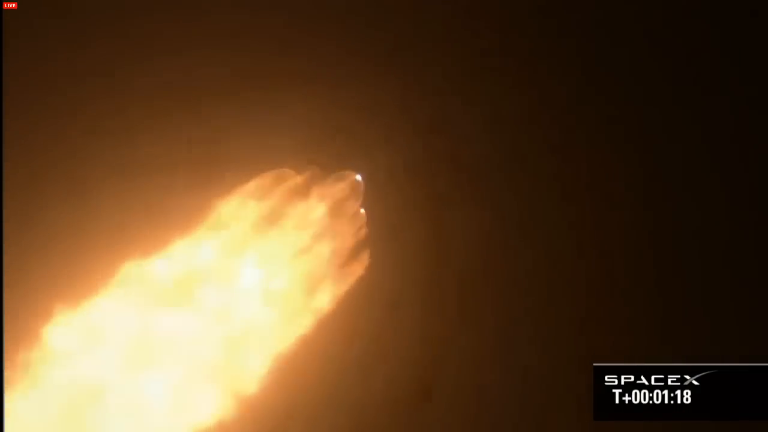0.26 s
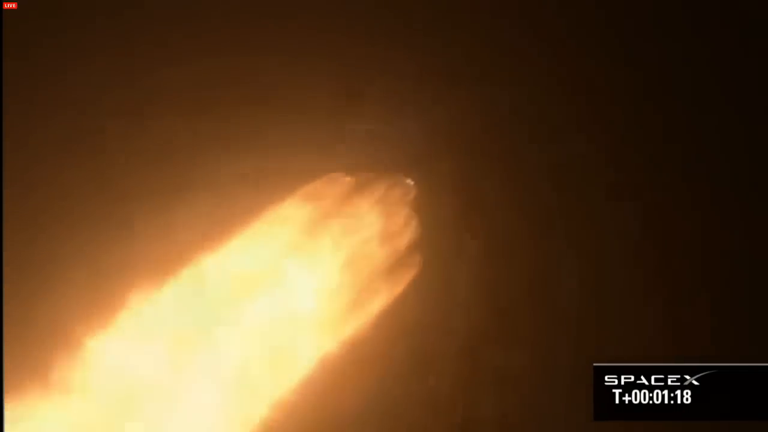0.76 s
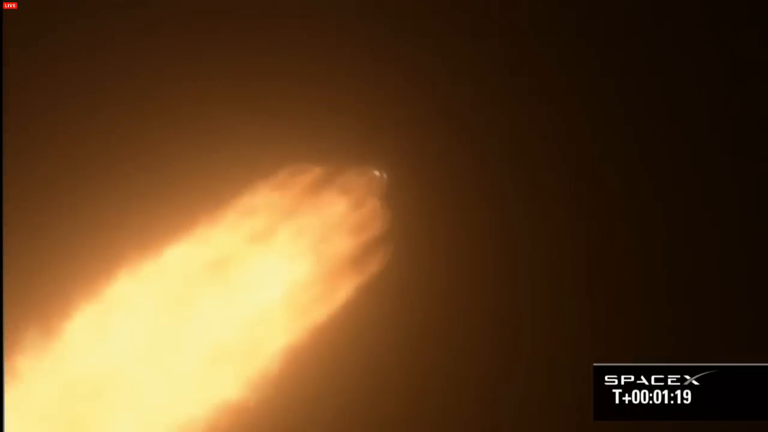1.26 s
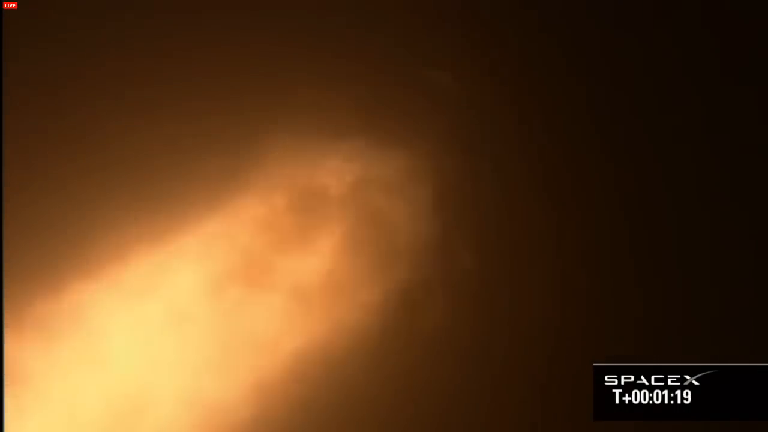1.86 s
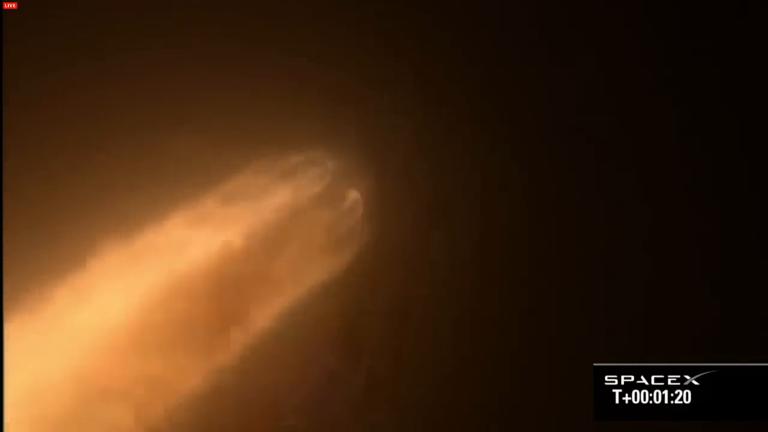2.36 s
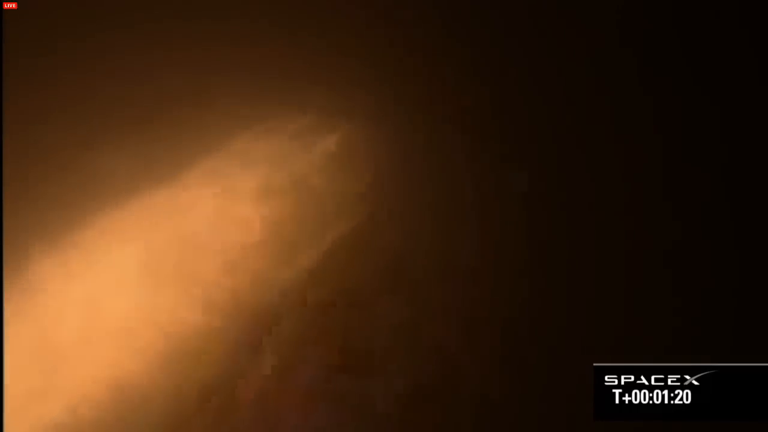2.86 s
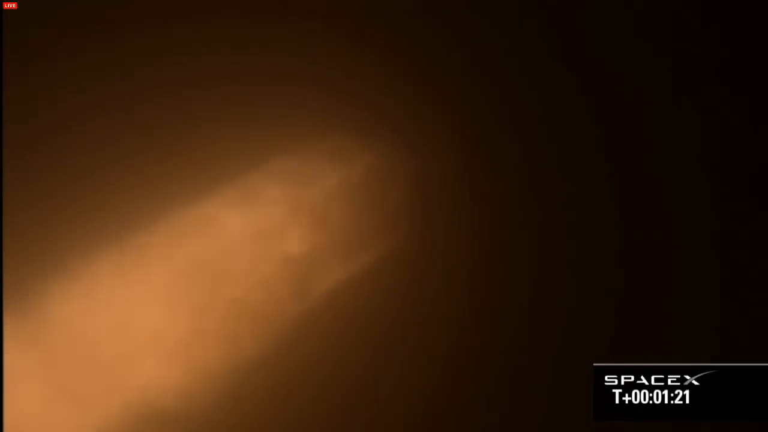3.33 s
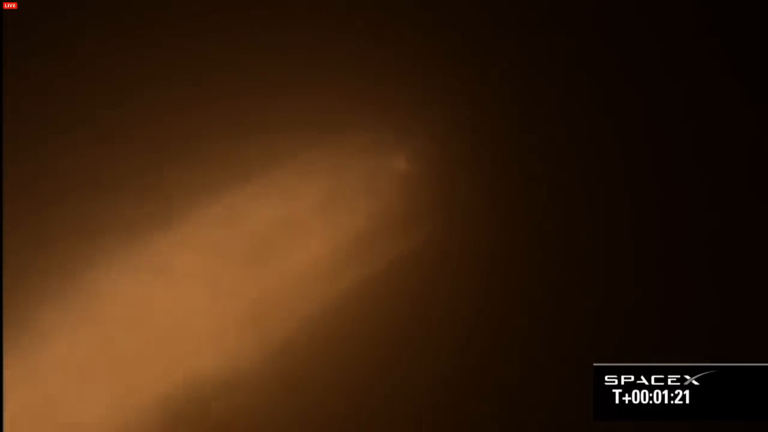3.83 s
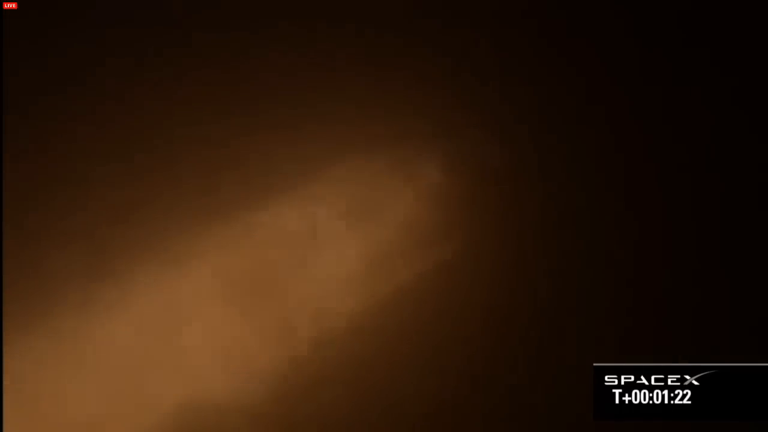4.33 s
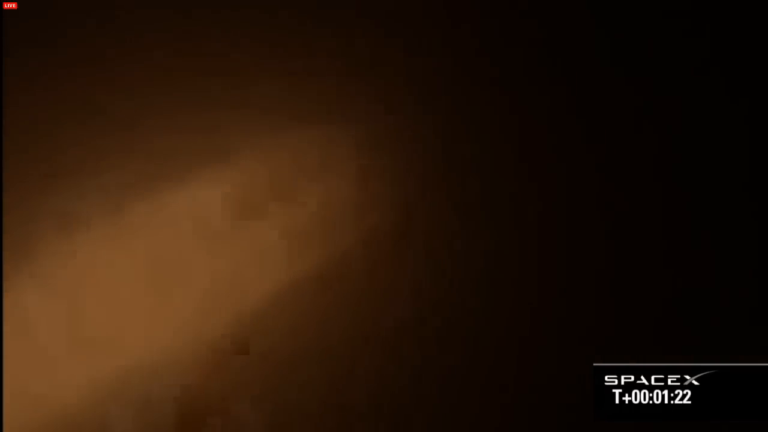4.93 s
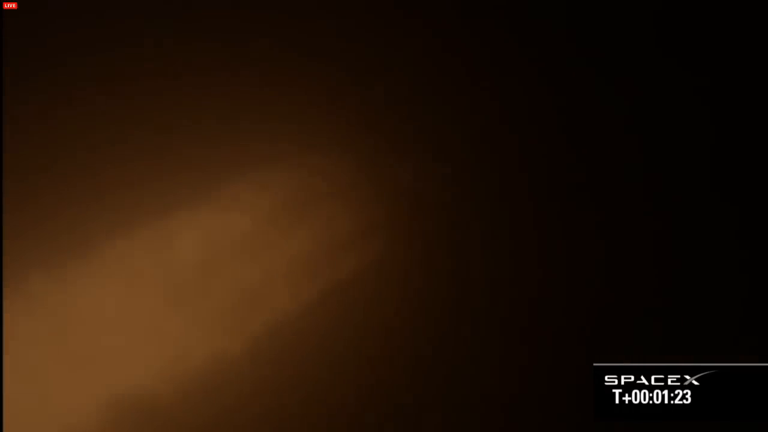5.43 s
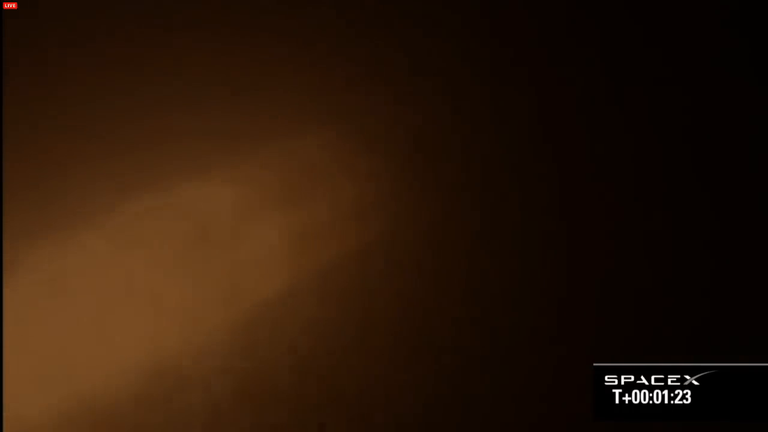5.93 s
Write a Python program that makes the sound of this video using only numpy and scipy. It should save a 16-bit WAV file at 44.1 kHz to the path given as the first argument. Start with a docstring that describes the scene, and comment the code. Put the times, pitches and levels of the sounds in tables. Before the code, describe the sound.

Low throbbing engine thunder from far overhead grows louder, crackling softly, beneath shrill cricket chirps, then distorts through a strained broadcast link.

```python
"""A rocket climbing far off at night, heard from the ground: a deep, lumpy rumble that swells, with soft crackle.
The rumble is shaped noise in several bands, dulled by the distance; the crackle is a dense train of tiny clicks.
Close to the microphone, crickets made of short gliding tones sing over soft air, a distant chorus and two ticks.
A faint rush of noise slides upward. A broadcast link breaks up roughly at the loudest rumble, rides the gain and
limits the treble, and its slipping sample clock lends the rumble a thin, high buzz."""
import sys
import numpy as np
from scipy import signal
from scipy.fft import rfft, irfft
from scipy.io import wavfile
from scipy.ndimage import uniform_filter1d

SR = 44100
rng = np.random.default_rng(int(sys.argv[2]) if len(sys.argv) > 2 else 0)


def generate_wav(signal):
    """Clip the signal to [-1, 1] and save it as 16-bit WAV at the path in sys.argv[1]."""
    frames = np.transpose(np.atleast_2d(signal))
    scaled = np.clip(frames, -1, 1) * 32767
    pcm = np.round(scaled).astype(np.int16)
    wavfile.write(sys.argv[1], SR, pcm)


N = 272888
TIME = np.arange(N) / SR  # seconds

# All source levels are those before the link's gain control.


def gain_of(db):
    """Decibels to amplitude."""
    return 10 ** (np.asarray(db) / 20)


def evened(x):
    """Scales to rms 1."""
    return x / np.sqrt(np.mean(x ** 2) + 1e-20)


def level(curve):
    """A table of (time_s, level_db) as a gain for every sample."""
    return gain_of(np.interp(TIME, *np.transpose(curve)))


def coloured(x, shape):
    """Gives x a spectrum of (freq_hz, level_db) points, silent outside them, at rms 1."""
    hz, db = np.transpose(shape)
    bins = np.fft.rfftfreq(N, 1 / SR)
    shape_db = np.interp(np.log(bins + 1), np.log(hz), db, left=-np.inf, right=-np.inf)
    return evened(irfft(rfft(x) * gain_of(shape_db), N))


def noise(shape):
    """Noise with a spectrum of (freq_hz, level_db) points, at rms 1."""
    return coloured(rng.standard_normal(N), shape)


def swells(events, half_s):
    """A gain that rises or dips in one smooth arch at each (centre_s, peak_db) event and is 1 between them."""
    db = np.zeros(N)
    for centre, peak_db in events:
        near = abs(TIME - centre) < half_s
        arch = np.cos(np.pi / 2 * (TIME[near] - centre) / half_s) ** 2
        db[near] += peak_db * arch
    return gain_of(db)


def steadied(x, span_s):
    """Lets x throb quickly but holds its power near 1 over longer spans."""
    span = int(span_s * SR)
    power = uniform_filter1d(uniform_filter1d(x ** 2, span), span)
    return evened(x / np.sqrt(power + 1e-6))


# spectrum of the soft outdoor wash: freq_hz, level_db
AIR_SPECTRUM = [(100, 15), (500, -1.5), (1100, 1.5), (1600, -3), (2300, -6.5), (3200, -12), (4300, -16),
                (5000, -16.5), (5800, -29), (9000, -25), (16000, -36)]
# spectrum of the wide hiss: freq_hz, level_db
HISS_SPECTRUM = [(100, 0), (2200, -6), (3500, 0), (6500, 2), (9500, -2), (12000, -2), (16000, -5)]


def night_air(air_db=-57.2, hiss_db=-70):
    """A soft outdoor wash in the middle and a fainter hiss, independent in each channel."""
    hiss = gain_of(hiss_db) * coloured(rng.standard_normal((2, N)), HISS_SPECTRUM)
    air = gain_of(air_db) * noise(AIR_SPECTRUM)
    return air + hiss


# spectrum of the distant crickets: freq_hz, level_db
CHORUS_SPECTRUM = [(5800, -52.5), (6450, -20.5), (6720, -5.5), (6920, 3), (7100, -1), (7300, -9),
                   (7500, -18.5), (8600, -21.5), (10000, -39)]
# moments when many distant crickets chirp together: centre_s, rise_db (above the steady chorus)
CHORUS_UNISONS = [(.22, 3), (.47, 3.5), (.876, 3.5), (1.29, 4), (1.51, 3), (1.826, 3), (2.222, 3.5),
                  (2.722, 3.5), (2.99, 2.5), (3.256, 1), (3.472, 1.5), (3.714, 1), (4.05, 3.5),
                  (4.293, 1.5), (4.6, 2), (4.913, 1.5), (5.187, 2.5), (5.409, 4.5)]


def chorus(steady_db=-67):
    """Many distant crickets merge into one shrill band that pulses when their chirps coincide."""
    pulses = swells(CHORUS_UNISONS, half_s=.1)
    return gain_of(steady_db) * pulses * noise(CHORUS_SPECTRUM)


def cricket(chirps, pitch_hz, fall_hz, gap_s, half_stroke_s):
    """Each wing stroke rings the wing near one pitch, which sags as the stroke slows."""
    out = np.zeros(N)
    for start, strokes, db in chirps:
        for k in range(round(strokes)):
            centre = start + k * gap_s
            near = abs(TIME - centre) < half_stroke_s
            u = (TIME[near] - centre) / half_stroke_s  # -1 to 1 through the stroke
            hz = pitch_hz + rng.normal(0, 26) - fall_hz * u
            tone = np.sin(2 * np.pi * np.cumsum(hz) / SR)
            envelope = np.cos(np.pi * u / 2) ** 2
            out[near] += gain_of(db + rng.normal(0, 1)) * envelope * tone
    return out


# Cricket songs: start_s (centre of the first wing stroke), strokes (count), level_db (varied a little per stroke)
# the nearest cricket
NEAR_CHIRPS = [(.16, 3, -60), (.41, 2, -64), (.60, 2, -61), (.87, 3, -62), (1.205, 3, -68), (1.53, 3, -63),
               (1.82, 3, -61), (2.233, 2, -60.5), (2.437, 2, -58), (2.67, 2, -60), (2.905, 3, -60.5),
               (3.213, 2, -57.5), (3.447, 2, -57), (3.672, 3, -57.5), (3.97, 3, -60), (4.297, 3, -59),
               (4.62, 3, -58.5), (4.897, 2, -58), (5.133, 2, -62), (5.37, 2, -56), (5.612, 2, -60.5),
               (5.84, 3, -59), (6.12, 2, -70.5)]
# a farther, lower cricket
FARTHER_CHIRPS = [(4.39, 2, -81), (4.635, 2, -68), (4.9, 2, -68), (5.175, 2, -75), (5.455, 2, -74.5),
                  (5.74, 2, -81.5)]
# one trill of a small, high cricket
HIGH_TRILL = [(3.51, 7, -74)]


def crickets():
    """Three crickets, each with its own wing pitch and stroke timing."""
    near = cricket(NEAR_CHIRPS, pitch_hz=7210, fall_hz=50, gap_s=.046, half_stroke_s=.018)
    far = cricket(FARTHER_CHIRPS, pitch_hz=6370, fall_hz=20, gap_s=.045, half_stroke_s=.02)
    small = cricket(HIGH_TRILL, pitch_hz=8540, fall_hz=30, gap_s=.069, half_stroke_s=.02)
    return near + far + small


# faint ticks nearby: start_s, level_db (at the onset)
TICK_TIMES = [(1.128, -60), (1.445, -56)]
# spectrum of the ticks: freq_hz, level_db
TICK_SPECTRUM = [(800, -16), (1900, -4), (2600, 0), (3200, -7), (6000, -20)]


def ticks(decay_s=0.011):
    """Short, dry puffs of bright noise that start at once and die away exponentially."""
    envelope = np.zeros(N)
    for start, db in TICK_TIMES:
        decay = np.exp(-abs(TIME - start) / decay_s)
        envelope += gain_of(db) * (TIME > start) * decay
    return envelope * noise(TICK_SPECTRUM)


# a faint band of rushing noise that glides upward: time_s, centre_hz, level_db
RUSH_GLIDE = [(0, 540.5, -68.5), (2.399, 603, -79), (2.802, 720, -72), (3.301, 893, -64.5),
              (3.7, 1078, -70), (4.099, 1304, -66.5), (4.6, 1527, -85.5), (6.19, 1524, -84)]


def rush(half_width_hz=110):
    """A narrow band of noise, made by shifting low-passed noise up to a sliding centre pitch."""
    s, hz, db = np.transpose(RUSH_GLIDE)
    low_pass = signal.butter(2, half_width_hz, fs=SR, output="sos")
    band = evened(signal.sosfilt(low_pass, rng.standard_normal(N)))
    centre_hz = np.interp(TIME, s, hz)
    carrier = np.sqrt(2) * np.cos(2 * np.pi * np.cumsum(centre_hz) / SR)
    return gain_of(np.interp(TIME, s, db)) * band * carrier


# soft crackle, including the link's own rough breakup when the rumble peaks: time_s, level_db
CRACKLE_LEVEL = [(0, -61.5), (2.3, -60.5), (2.85, -58.5), (3.6, -64), (4.4, -59.5), (4.7, -56),
                 (5.19, -57.5), (5.255, -50.5), (5.45, -45.5), (5.6, -54.5), (6.19, -49)]
# spectrum filter of the crackle: freq_hz, level_db
CRACKLE_SPECTRUM = [(150, -15), (330, -0.5), (600, -2), (900, -9), (1500, -18), (3000, -37), (8000, -50)]


def crackle(per_s=1800, spread_db=2.5):
    """A dense train of small clicks of uneven size, softened by a falling spectrum."""
    size = gain_of(spread_db * np.minimum(rng.exponential(1, N), 4))
    clicks = size * (rng.random(N) < per_s / SR)
    return level(CRACKLE_LEVEL) * coloured(clicks, CRACKLE_SPECTRUM)


# rough low noise from the overloaded link, opposite in the two channels: time_s, level_db
OVERLOAD_LEVEL = [(0, -92), (5.0, -88.5), (5.25, -47), (5.4, -35), (5.55, -51), (6.19, -48)]
# its spectrum: freq_hz, level_db
OVERLOAD_SPECTRUM = [(60, -13), (130, 4), (250, -7.5), (500, -20), (1000, -30), (2000, -56)]


def overload_noise():
    """The overloaded link adds rough noise, here shaped noise of opposite polarity left and right."""
    opposite = np.array([[1], [-1]])
    return level(OVERLOAD_LEVEL) * noise(OVERLOAD_SPECTRUM) * opposite


# Exhaust levels: time_s, level_db. Exhaust spectra: freq_hz, level_db
# slow swell of the deep rumble
SURGE_LEVEL = [(0, -28), (.2, -23), (.55, -23.5), (.8, -21.5), (1.3, -25.5), (2.0, -23), (2.8, -20.5),
               (3.75, -23), (4.1, -17.5), (4.6, -15.5), (5.15, -14), (5.33, -6), (5.58, -11.5),
               (6.19, -10.5)]
SURGE_SPECTRUM = [(15, -35), (35, -13), (50, -3), (60, 0), (78, -2.5), (98, -6.5), (115, -17), (150, -36),
                  (250, -70)]
# weight of the largest, slowest eddies within the surges, before the surge is steadied
DEEP_LEVEL = [(0, -9.5), (1.5, -9.5), (3.5, -3.5), (4, -1), (5.35, 1.5), (5.6, -6), (6.19, -11.5)]
DEEP_SPECTRUM = [(8, -34), (18, -21), (28, -8), (41, 0), (50, -6), (70, -20), (120, -50)]
# the roar of the smaller eddies
ROAR_LEVEL = [(0, -32.5), (.45, -29.5), (.85, -34.5), (1.15, -31), (1.75, -34), (2.1, -31.5), (3.1, -30.5),
              (3.45, -28), (3.85, -30.5), (4.55, -26.5), (5.1, -28.5), (5.48, -21), (5.8, -21.5),
              (6.19, -24)]
ROAR_SPECTRUM = [(70, -25), (100, -6), (118, 0), (143, -4.5), (163, -1.5), (185, -17), (222, -19),
                 (275, -30), (420, -58)]
# the upper edge of the roar, which grows far less than the bass
BODY_LEVEL = [(0, -46.5), (1.2, -43.5), (1.8, -46), (2.6, -44.5), (3.8, -46), (4.3, -45.5), (4.7, -43),
              (5.2, -44), (5.5, -40.5), (6.19, -39)]
BODY_SPECTRUM = [(150, -17), (205, -2), (228, 0), (275, -2), (340, -10.5), (420, -20.5), (700, -49)]
# the loudest thumps of the exhaust: centre_s, rise_db (above the swell)
EXHAUST_THUMPS = [(.277, 8.5), (.518, 7.5), (1.023, 7.5), (1.167, 7), (1.332, 7.5), (1.435, 7),
                  (1.516, 8.5), (1.687, 8), (2.147, 3.5), (2.213, 5), (2.726, 8), (2.994, 3.5), (3.074, 2),
                  (3.328, 7.5), (3.59, 8), (3.836, 2.5), (4.019, 4), (4.493, 2.5), (4.853, 4), (5.417, 1),
                  (5.791, 7), (6.009, 6.5)]
# brief lulls in the rumble: centre_s, change_db (against the swell)
RUMBLE_LULLS = [(.81, -5.5), (1.086, 0), (1.249, -6), (1.745, -6), (2.04, -12.5), (3.381, -11),
                (4.331, -4.5), (4.92, -3), (5.179, -6), (5.83, -3.5)]


def exhaust():
    """Large eddies throb in the deep bass, smaller ones roar above."""
    eddies = noise(SURGE_SPECTRUM) + level(DEEP_LEVEL) * noise(DEEP_SPECTRUM)
    lumps = swells(EXHAUST_THUMPS, half_s=.033) * swells(RUMBLE_LULLS, half_s=.04)
    surge = level(SURGE_LEVEL) * lumps * steadied(eddies, span_s=.06)
    roar = level(ROAR_LEVEL) * steadied(noise(ROAR_SPECTRUM), span_s=.11)
    body = level(BODY_LEVEL) * noise(BODY_SPECTRUM)
    return surge + roar + body


def scene():
    """The distant rocket and the link's breakup over the sounds around the microphone, nearly all in mono."""
    near_insects = crickets()
    night = night_air() + chorus() + near_insects + ticks()
    rumble = exhaust() + overload_noise() + crackle()
    return rumble + rush() + night


# power above which the gain control acts: left_db, right_db
CEILING = [-11.8, -10.8]


def gain_control(x, listen_s=.08, smooth_s=.15, recover_db_per_s=.3):
    """Each channel's gain sinks under the loudest rumble and creeps back, taking the night sounds with it."""
    power = uniform_filter1d(x ** 2, int(listen_s * SR), axis=1)
    power_db = 10 * np.log10(abs(power) + 1e-12)
    over_db = np.maximum(power_db - np.array(CEILING)[:, None], 0)
    # hold the greatest excess so far, less a steady recovery
    recovery = recover_db_per_s * TIME
    held_db = np.maximum.accumulate(over_db + recovery, axis=1) - recovery
    return x / gain_of(uniform_filter1d(held_db, int(smooth_s * SR), axis=1))


def clock_slip(x, slip_hz=3900, slip_samples=.9, ripple_db=-56.5):
    """Sample timing drifts and snaps back, mirroring the rumble round multiples of that rate."""
    turns = slip_hz * (TIME + .5 / SR)
    drift = slip_samples * (turns % 1 - .5)
    timing_error = drift * np.gradient(x, axis=1)  # a small time shift changes x by its slope
    # the gain ripples slightly in step with the slips
    ripple = gain_of(ripple_db) * np.cos(2 * np.pi * turns)
    return x * (1 - ripple) + timing_error


def record(dry):
    """The broadcast link: gain control, slipping clock, band limit."""
    low_pass = signal.firwin(1023, 15780, window=("kaiser", 9), fs=SR)  # cutoff in Hz
    slipped = clock_slip(gain_control(dry))
    return signal.oaconvolve(slipped, low_pass[None], "same")


dry = scene()
out = record(dry)
generate_wav(out)
```